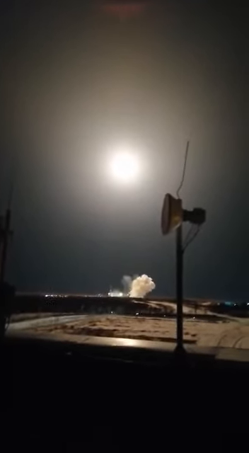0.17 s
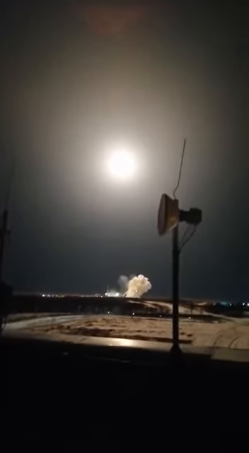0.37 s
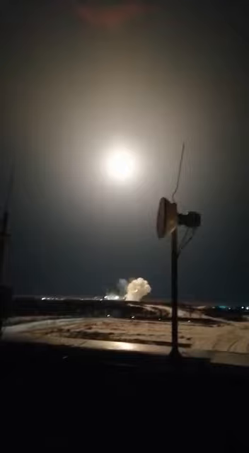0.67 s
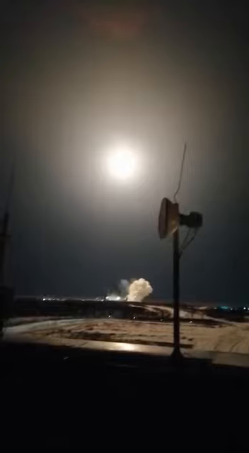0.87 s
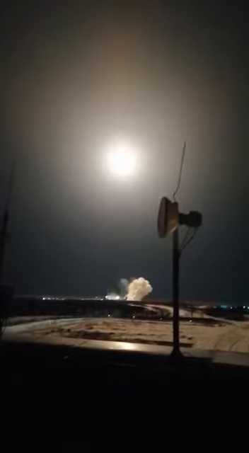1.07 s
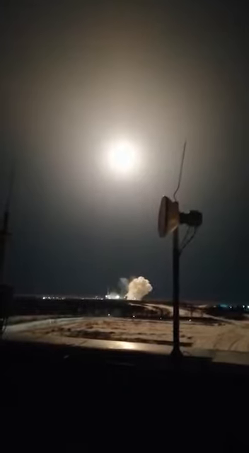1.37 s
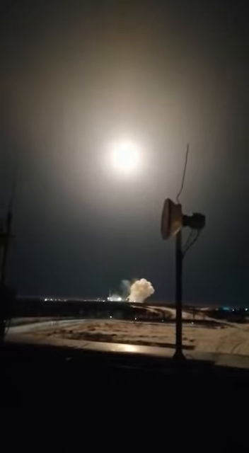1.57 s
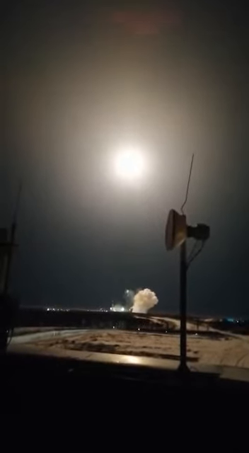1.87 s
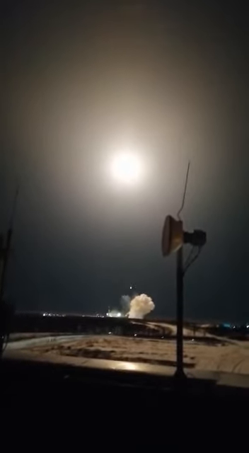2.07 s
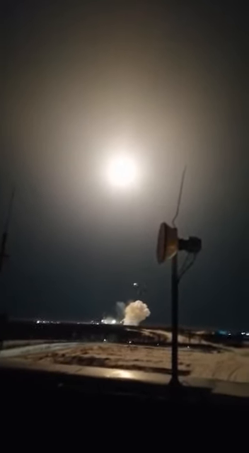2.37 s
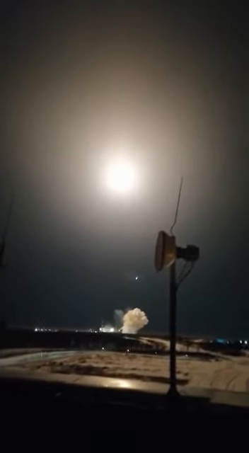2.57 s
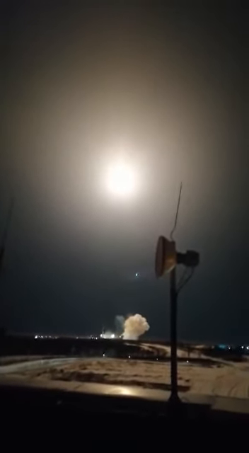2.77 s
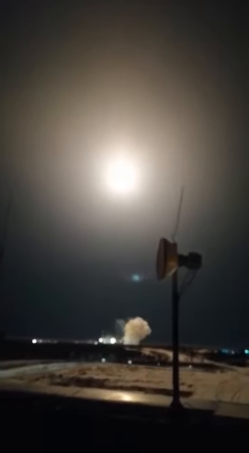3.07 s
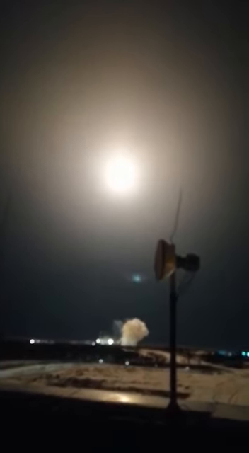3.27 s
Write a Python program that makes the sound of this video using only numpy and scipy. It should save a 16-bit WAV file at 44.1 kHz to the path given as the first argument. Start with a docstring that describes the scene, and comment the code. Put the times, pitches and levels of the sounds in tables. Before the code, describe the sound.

Low, throbbing roar of a faraway climbing rocket, dotted with sharp pops and growing crackle.

```python
"""A rooftop at night: a rocket climbs far away, heard by a phone with two unlike microphone ports.
The turbulent exhaust jet throbs, rumbles and roars; the ground echo adds a hump to the roar.
Steep shock fronts ride on it as a crackle that thickens towards the end.
Roof and ground scatter every front into a short blur; the right port hears the treble a little later."""
import sys
import numpy as np
from scipy import signal
from scipy.fft import rfft, irfft
from scipy.io import wavfile
from scipy.ndimage import uniform_filter1d

SR = 44100
rng = np.random.default_rng(int(sys.argv[2]) if len(sys.argv) > 2 else 0)


def bounce(signal):
    """Save signal as a 16-bit WAV file at the path given by the first command-line argument."""
    frames = np.transpose(np.atleast_2d(signal))
    limited = np.clip(frames, -1, 1)
    pcm = np.round(limited * 32767).astype(np.int16)
    wavfile.write(sys.argv[1], SR, pcm)


N = 150381

# Part of the jet noise that arrives scattered, unlike at the two ports: freq_hz, power_share
SCATTERED_SHARE = [(25, 0), (120, 0.13), (400, 0.43), (1000, 0.3), (3000, 0.8)]
# Strong shock fronts: start_s, relative_db, smear (0-1, share broken into small steps), roar_swell_db
SHOCK_FRONTS = [(0.1034, -38, 0.4, 5), (0.2259, -39, 0.55, 4.5), (0.2363, -40, 0.2, 1),
                (0.2808, -49, 0.3, 1.5), (0.323, -49, 0.4, 5), (0.408, -42, 0.5, 3.5),
                (0.4559, -34.5, 0.44, 3.5), (0.6556, -36, 0.4, 3), (0.718, -39.5, 0.6, 1.5),
                (0.7844, -41, 0.75, 4), (0.807, -36.5, 0.58, 0), (0.8853, -50, 0.5, -1),
                (0.9577, -41, 0.2, -2), (1.0176, -37.5, 0.7, 0.5), (1.0528, -33.5, 0.45, 2),
                (1.0865, -43, 0.5, 0.5), (1.1204, -38, 0.6, 4), (1.132, -32.5, 0.4, 5),
                (1.2501, -35.5, 0.55, 4.5), (1.2614, -43, 0.5, 2.5), (1.3463, -45, 0.3, 2),
                (1.3912, -40.5, 0.5, 3), (1.4401, -33, 0.55, 8), (1.4684, -42, 0.5, -4),
                (1.5099, -35.5, 0.5, 2), (1.5454, -45, 0.4, 1), (1.5584, -39, 0, 6),
                (1.6356, -37, 0.4, 6.5), (1.8652, -43, 0.6, 2.5), (1.9384, -54, 0.3, 5),
                (2.124, -38.5, 0.35, 1), (2.3261, -43, 0.5, 4.5), (2.36, -47, 0.37, 3),
                (2.4029, -33, 0.54, 10.5), (2.5174, -45, 0.4, 4), (2.6244, -37, 0.55, 3.5),
                (2.6553, -31, 0.56, 7.5), (2.6888, -34.5, 0.4, 4), (2.7226, -45, 0.4, 2),
                (2.7791, -26.5, 0.46, 7), (2.8, -36, 0.5, 2.5), (2.8357, -28, 0.34, 6),
                (2.8595, -39, 0.5, 2.5), (2.8874, -37, 0.7, 2), (2.9193, -25, 0.42, 1),
                (2.9317, -34, 0.2, 1.5), (2.9799, -28, 0.2, 2.5), (3.029, -26.5, 0.17, -0.5),
                (3.052, -25.5, 0.32, 7.5), (3.084, -24, 0.37, 8.5), (3.134, -34, 0.25, 6.5),
                (3.145, -27.5, 0.3, 4.5), (3.1758, -35, 0.3, 1.5), (3.2006, -23.5, 0.28, 4.5),
                (3.3019, -25.5, 0.2, 5), (3.3182, -23.5, 0.35, 5), (3.3422, -31, 0.53, 6),
                (3.3927, -38, 0.27, 6.5)]
# Spectrum of a strong front, which stays steep and reaches high: freq_hz, gain_db
STEEP_SPECTRUM = [(60, -6.5), (300, 5), (1000, 2), (2500, 1.5), (6000, -1.5), (9000, -4), (11000, -8.5),
                  (14000, -28)]


def undb(db):
    """Gain of a level in dB."""
    return 10 ** (np.asarray(db) / 20)


def unit(x):
    """Scaled to rms 1."""
    return x / np.sqrt(np.mean(x ** 2))


def curve(table, column=1):
    """A column of a time table at every sample."""
    rows = np.array(table)
    return np.interp(np.arange(N) / SR, rows[:, 0], rows[:, column])


def over_hz(table, size):
    """A frequency table at every bin of a spectrum."""
    rows = np.array(table)
    return np.interp(np.log(np.fft.rfftfreq(size, 1 / SR) + 1), np.log(rows[:, 0]), rows[:, 1])


def colour(x, table, size=8192):
    """Minimum-phase filter with the table's gain."""
    cepstrum = irfft(np.log(undb(over_hz(table, size))))
    cepstrum[1:size // 2] *= 2
    cepstrum[size // 2 + 1:] = 0
    impulse = irfft(np.exp(rfft(cepstrum)))[None, :size // 2]
    return signal.fftconvolve(np.atleast_2d(x), impulse, axes=1)[:, :N]


def walk(rate_hz):
    """Random levels, held and smoothed twice; rms 1."""
    hold = int(SR / rate_hz)
    levels = np.repeat(rng.standard_normal(N // hold + 1), hold)
    return unit(uniform_filter1d(uniform_filter1d(levels, hold), hold)[:N])


def jet(spectrum, level_db, steadiness):
    """Turbulent exhaust noise, its own surges evened by steadiness (0-1). Rows: direct, left, right."""
    flutter_db = 0.5
    share = np.clip(over_hz(SCATTERED_SHARE, N), 0, 1)
    bins = rfft(rng.standard_normal((3, N))) * undb(over_hz(spectrum, N))
    parts = irfft(bins * np.sqrt([1 - share, share, share]), N) / np.std(irfft(bins[0], N))
    mono = parts[0] + (parts[1] + parts[2]) / 2
    power = uniform_filter1d(np.abs(signal.hilbert(mono)) ** 2 / 2, size=1300)
    steadied = parts * (power + 0.081) ** (-steadiness / 2)
    return steadied * undb(level_db + flutter_db * walk(rate_hz=17))


def ground_hump(roar_db):
    """A narrow band where the ground echo adds to the roar; its pitch climbs with the rocket."""
    # Track of the band: time_s, centre_hz, level_db (re roar)
    track = [(0.02, 150, -10), (1.2, 175, -5), (2.0, 164.4, -6), (2.7, 195.1, -4), (3.39, 200.7, -10)]
    half_width_hz = 26
    share = np.clip(over_hz(SCATTERED_SHARE, N)[int(track[1][1] * N / SR)], 0, 1)
    b, a = signal.butter(2, half_width_hz, fs=SR)
    envelope = signal.lfilter(b, a, rng.standard_normal((3, N)) + 1j * rng.standard_normal((3, N)))
    band = np.real(envelope * np.exp(2j * np.pi * np.cumsum(curve(track)) / SR))
    return unit(band) * np.sqrt([[1 - share], [share], [share]]) * undb(roar_db + curve(track, column=2))


def roof_blur(steps, echo_db=-3.5, t60_s=0.08):
    """Fronts scatter off roof, masts and ground. Rows: direct, left echoes, right echoes."""
    fade = undb(-60 * np.arange(8192) / SR / t60_s) ** 2
    power = np.clip(signal.fftconvolve(steps ** 2, fade / fade.sum())[:N], 0, None)
    return np.vstack([steps, undb(echo_db) * np.sqrt(power) * rng.standard_normal((2, N))])


def crackle():
    """Dense small shock fronts in surges; the louder, the steeper and brighter."""
    # Crackle strength: time_s, relative_db
    strength = [(0.02, -51), (1.12, -51.5), (1.61, -47), (2.04, -50), (2.38, -50.5), (2.68, -45),
                (2.76, -45.5), (2.87, -42), (3.02, -42.5), (3.12, -43.5), (3.26, -46.5), (3.39, -47.5)]
    # Spectrum of a front dulled by the air: freq_hz, gain_db
    dull_spectrum = [(60, -15.5), (300, 2), (1000, 7), (2500, -6), (6000, -7), (9000, -15), (14000, -45)]
    fronts_per_s, spread_db, max_size_db = 1500, 2.5, 13
    gain_db, surge_db, fully_steep_db = 10, 1, -38
    arrival_draw, size_draw, sign_draw = rng.random((3, N))
    size = undb(np.minimum(-spread_db * np.log(1 - size_draw), max_size_db))
    steps = unit((arrival_draw < fronts_per_s / SR) * size * np.sign(sign_draw - .5))
    fronts = roof_blur(steps * undb(gain_db + curve(strength) + surge_db * walk(rate_hz=20)))
    steep = np.clip(undb(curve(strength) - fully_steep_db), 0, 1)
    return colour(fronts * (1 - steep), dull_spectrum) + colour(fronts * steep, STEEP_SPECTRUM)


def roar_swells_db(rise_s=0.0019, fall_s=0.0097):
    """The roar bunches up around most strong fronts and dips at a few."""
    t, total_db = np.arange(N) / SR, np.zeros(N)
    for start_s, _, _, swell_db in SHOCK_FRONTS:
        age_s = t - start_s - rise_s
        total_db += swell_db * np.exp(-(age_s / np.where(age_s < 0, rise_s, fall_s)) ** 2)
    return total_db


def shocks():
    """Each strong shock is a pressure step with a trail of smaller ones that builds and dies."""
    gain_db, trail_s, step_delay_s = 25, 0.0066, 0.001204
    steps, t = np.zeros(N + 4096), np.arange(2048) / SR
    noise = rng.standard_normal((len(SHOCK_FRONTS), len(t)))
    envelope = 2 * t / trail_s * np.exp(-t / trail_s) / np.sqrt(trail_s * SR)
    trails = noise * np.abs(noise) * envelope
    for (start_s, level_db, smear, _), trail in zip(SHOCK_FRONTS, trails):
        i = int(start_s * SR)
        steps[i + int(step_delay_s * SR)] += undb(level_db) * (1 - smear)
        steps[i:i + len(t)] += undb(level_db) * smear * trail
    return colour(roof_blur(steps[:N] * undb(gain_db)), STEEP_SPECTRUM)


def right_port_lag(direct):
    """Direct sound timed for the right port: with its port's own delay, the right side hears it slightly late,
    the treble most."""
    bass_lag_s, treble_lag_s, turn_hz = -.00006, .00012, 2300
    padded = np.pad(direct, 512, mode="reflect")
    hz = np.fft.rfftfreq(len(padded), 1 / SR)
    lag_s = bass_lag_s + (treble_lag_s - bass_lag_s) / (1 + (turn_hz / (hz + 1)) ** 4)
    return irfft(rfft(padded) * np.exp(-2j * np.pi * hz * lag_s), len(padded))[512:-512]


def scene():
    """Jet and fronts at the two ports: direct sound is shared, scattered sound differs."""
    # Jet band strengths: time_s, throb_db, rumble_db, roar_db
    levels = [(0.02, -29, -21, -21.5), (0.07, -21, -34, -23), (0.1, -40, -16, -22.5),
              (0.13, -23, -17, -24.5), (0.17, -36.5, -41, -22), (0.21, -33.5, -26, -23),
              (0.49, -29, -22, -22), (1.07, -30.5, -31, -21), (1.15, -28.5, -24, -22),
              (1.66, -31.5, -29.5, -21), (1.96, -28.5, -25, -24), (2.01, -27.5, -31.5, -23.5),
              (2.54, -30, -23, -23), (2.94, -24, -27, -18.5), (3.14, -27.5, -17, -23),
              (3.23, -25.5, -34, -22.5), (3.26, -28, -26, -27), (3.31, -16, -27, -21),
              (3.39, -29.5, -24.5, -28)]
    # Jet band spectra on arrival: freq_hz, relative_db
    throb_spectrum = [(18, -9.5), (32, -7), (47, -2), (62, -5.5), (80, -21.5), (200, -120)]
    rumble_spectrum = [(30, -89.5), (55, -26), (72, -9), (97, 0), (130, -11.5), (170, -45), (400, -120)]
    roar_spectrum = [(50, -87), (100, -8.5), (135, -8.5), (160, -2.5), (230, -6.5), (310, -8), (345, -15),
                     (382, -9.5), (430, -18), (650, -23), (1000, -35.5), (1800, -40), (3000, -46.5),
                     (6000, -87), (12000, -120)]
    throb = jet(throb_spectrum, curve(levels, column=1), steadiness=0.78)
    rumble = jet(rumble_spectrum, curve(levels, column=2), steadiness=0.66)
    roar_db = curve(levels, column=3) + roar_swells_db()
    roar = jet(roar_spectrum, roar_db, steadiness=0.15) + ground_hump(roar_db)
    direct, left, right = throb + rumble + roar + crackle() + shocks()
    return np.array([direct + left, right_port_lag(direct) + right])


def record(dry):
    """Each port colours the sound, a gain control evens it, the electronics hiss, the top is cut."""
    # Microphone port responses: freq_hz, gain_db
    left_port = [(20, 4.5), (180, 1), (1100, 2.5), (1500, -3), (2200, -3), (3200, 4.5), (3800, -4.5),
                 (4500, -3.5), (5300, -6), (6200, -7), (7000, -3), (8500, -11.5), (10000, -22.5),
                 (12500, -30.5), (15000, -30)]
    right_port = [(20, 4), (180, -1), (1000, 5.5), (1800, 4), (2150, -8.5), (3200, -1), (4000, -1),
                  (4900, -2), (5500, 1.5), (6300, -18.5), (7500, -39), (10000, -32), (15000, -34.5)]
    squeeze, window_s, knee_db = 0.23, 0.029, -19
    hiss_db, cutoff_hz = -86, 15200
    ports = np.vstack([colour(dry[0], left_port), colour(dry[1], right_port)])
    window = int(window_s * SR)
    power = uniform_filter1d(uniform_filter1d(np.mean(ports ** 2, axis=0), window), window)
    gain = (1 + power / undb(knee_db) ** 2) ** (-squeeze / 2)
    hiss = undb(hiss_db) * rng.standard_normal((2, N))
    lowpass = signal.ellip(10, .2, 70, cutoff_hz, fs=SR, output="sos")
    return signal.sosfilt(lowpass, ports * gain + hiss)


dry = scene()
out = record(dry)
bounce(out)
```